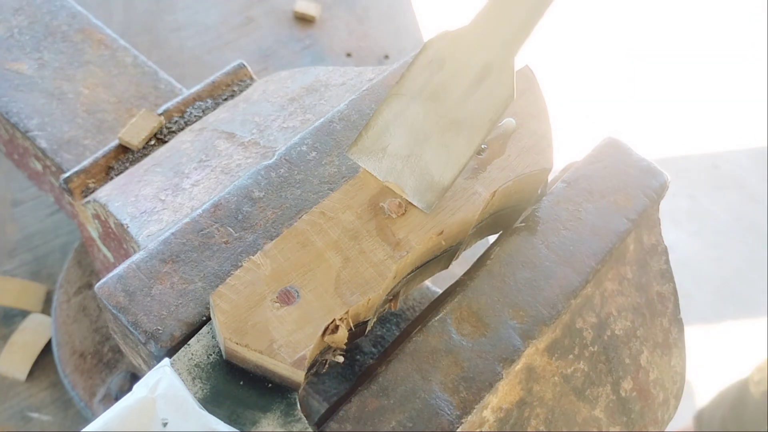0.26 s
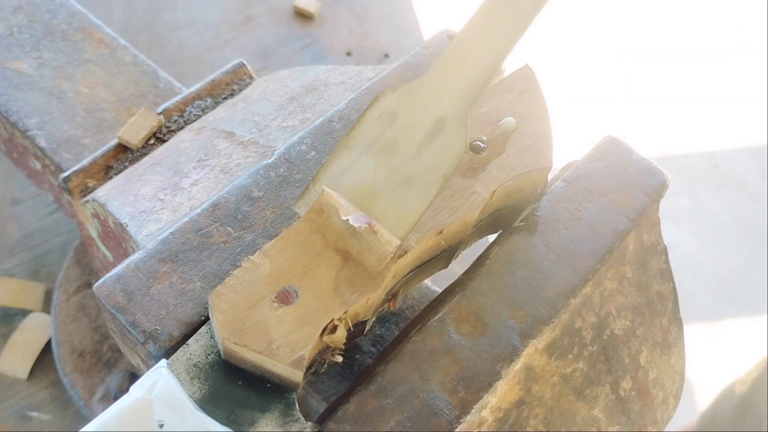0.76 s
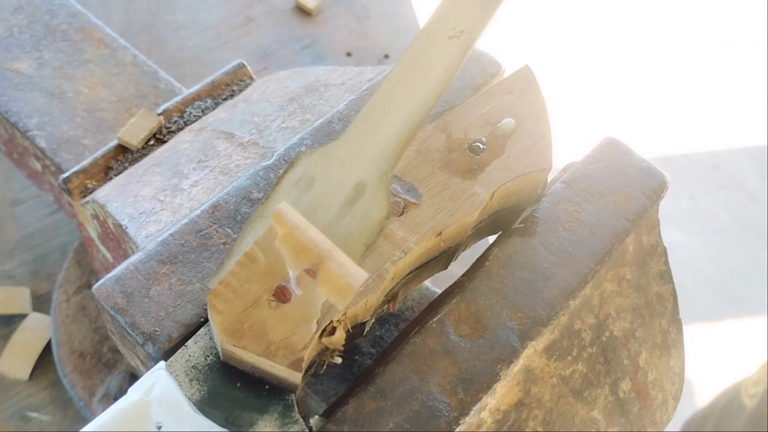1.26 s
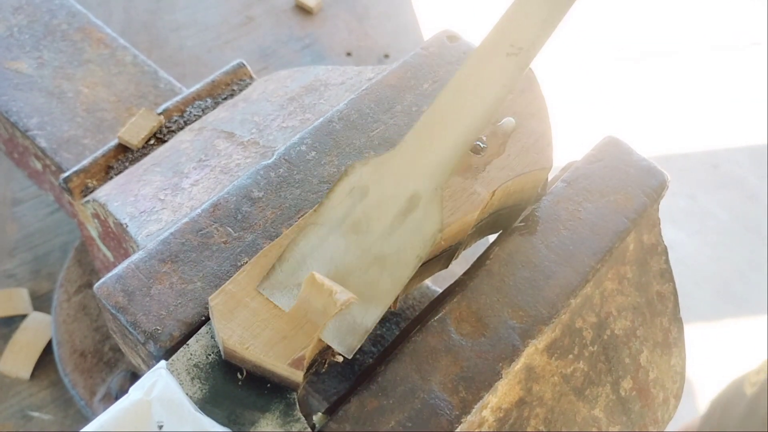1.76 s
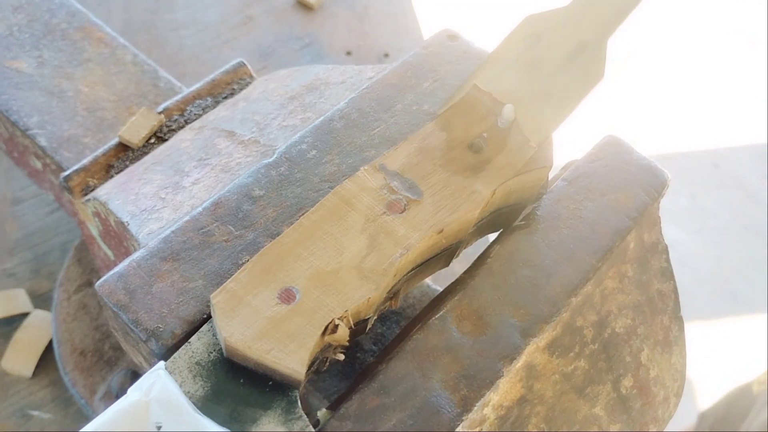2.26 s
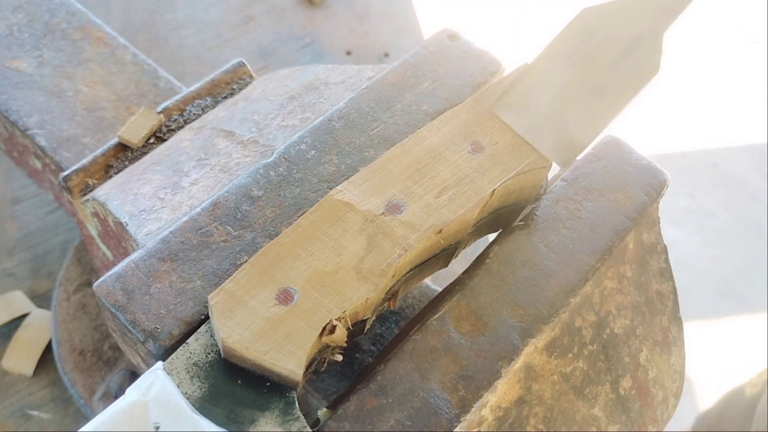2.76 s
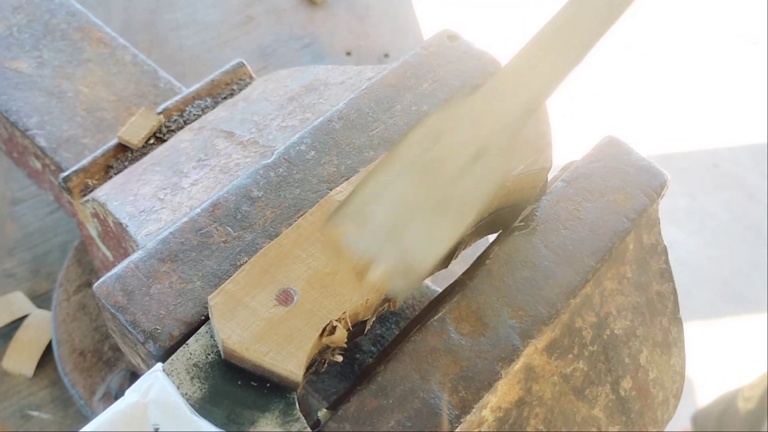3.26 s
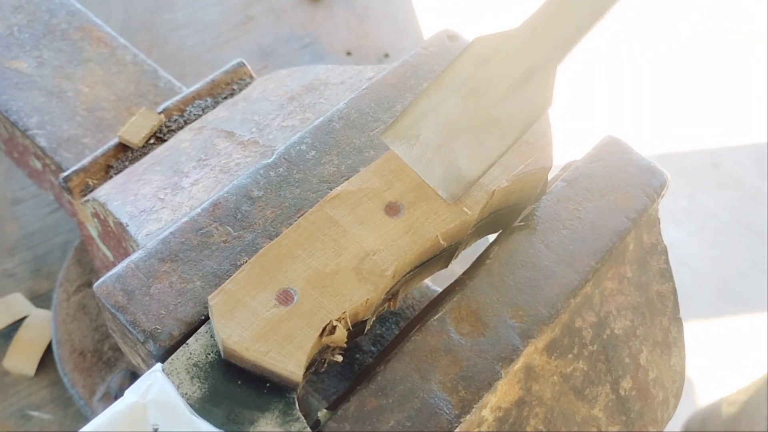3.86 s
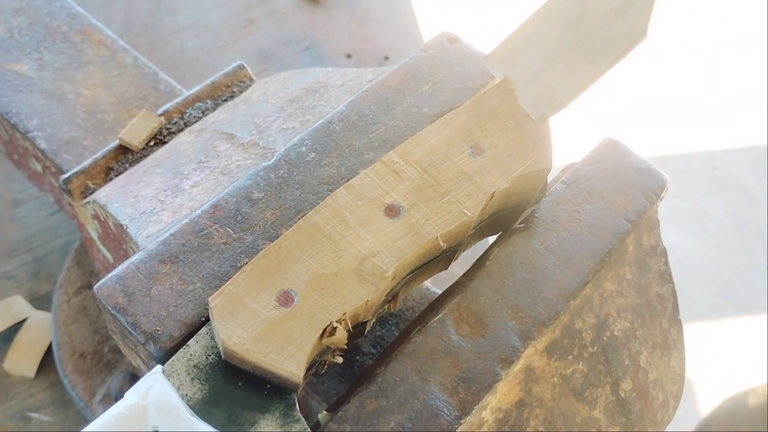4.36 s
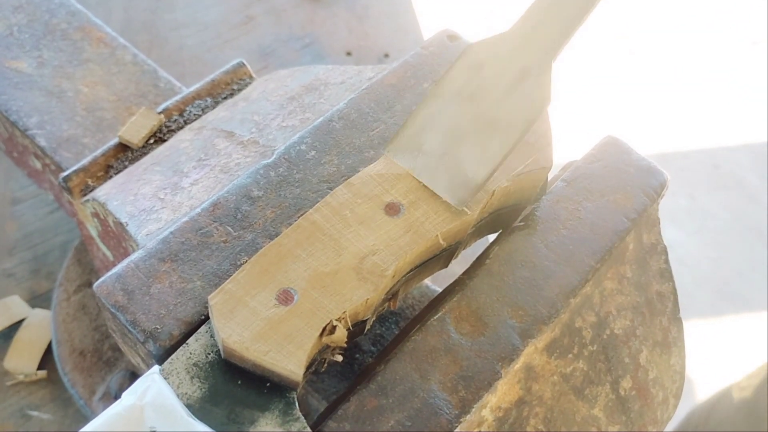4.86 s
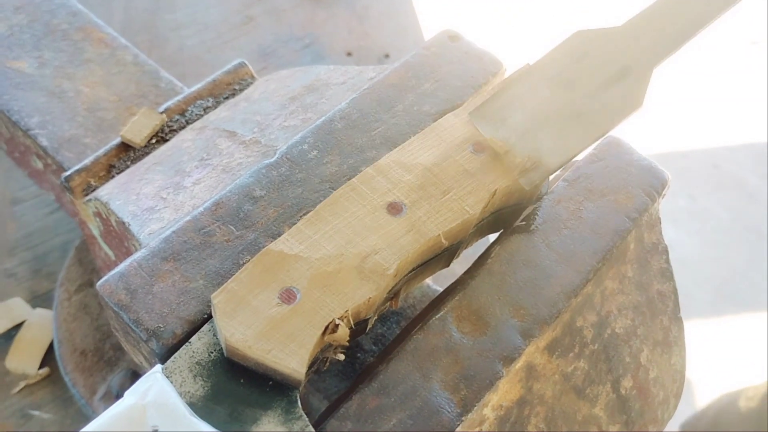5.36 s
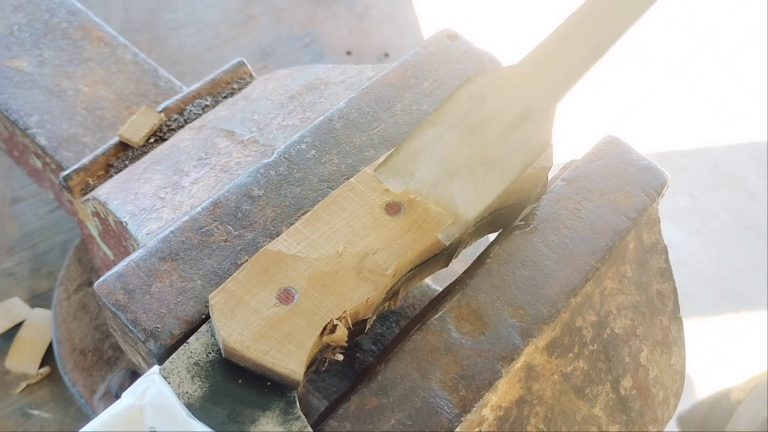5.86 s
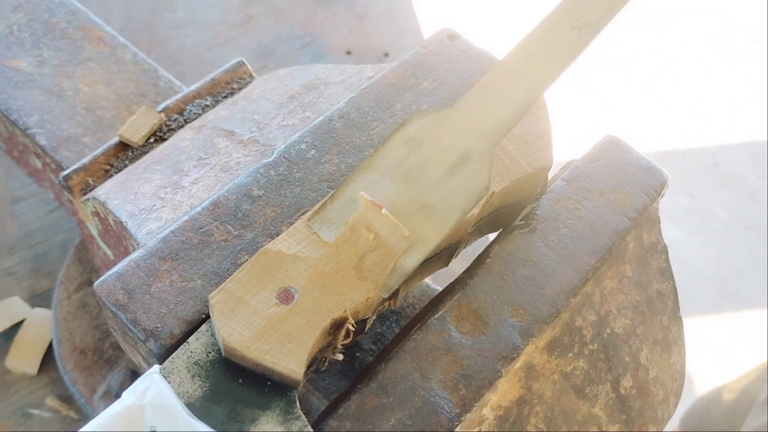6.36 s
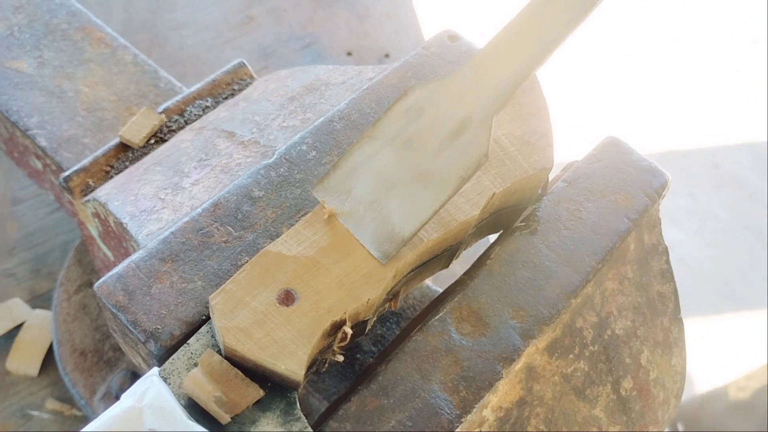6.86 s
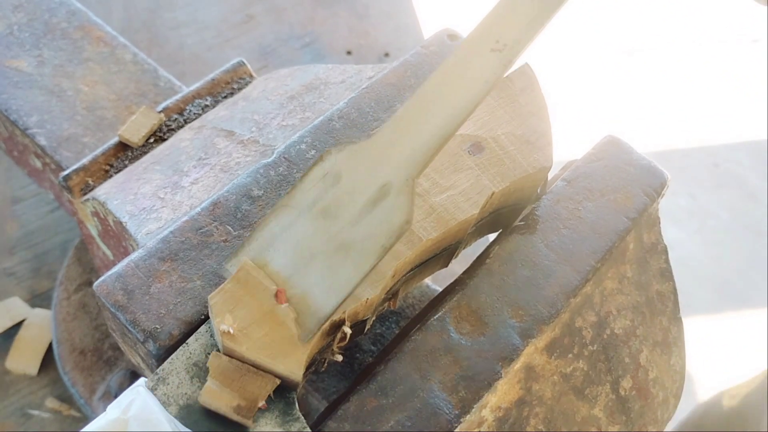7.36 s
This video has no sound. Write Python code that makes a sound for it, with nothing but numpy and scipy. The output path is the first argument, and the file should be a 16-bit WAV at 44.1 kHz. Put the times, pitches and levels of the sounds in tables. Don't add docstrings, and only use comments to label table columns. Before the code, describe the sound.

A chisel is knocked quickly along wood in a vise outdoors, with dry cracks, grainy rattles and scraping under heavy, thumping wind gusts.

```python
import sys
import numpy as np
from scipy import signal
from scipy.fft import rfft, irfft, next_fast_len
from scipy.io import wavfile
from scipy.ndimage import uniform_filter1d

SR = 44100
rng = np.random.default_rng(int(sys.argv[2]) if len(sys.argv) > 2 else 0)


def inscribe(sig):
    pcm = np.round(np.clip(np.atleast_2d(sig).T, -1, 1) * 32767)
    wavfile.write(sys.argv[1], SR, pcm.astype(np.int16))


def undo_db(level):
    steps = np.asarray(level, float) / 20
    return 10 ** steps


N = 335691


def in_time(rows):
    s, *columns = np.transpose(rows)
    return [np.interp(np.arange(N) / SR, s, column) for column in columns]


def rms_one(x):
    return x / np.sqrt(np.mean(x ** 2) + 1e-20)


def coloured(spectrum):
    size = next_fast_len(N)
    hz = np.maximum(np.arange(size // 2 + 1) * SR / size, 1)
    points = np.array(spectrum, float)
    gain = undo_db(np.interp(np.log(hz), np.log(points[:, 0]), points[:, 1]))
    return rms_one(irfft(rfft(rng.standard_normal(size)) * gain, size)[:N])


def drift(rate_hz):
    r = np.exp(-2 * np.pi * rate_hz / SR)
    return rms_one(signal.lfilter([1], [1, -2 * r, r * r], rng.standard_normal(N)))


def lowpass(x, order, top_hz):
    return signal.sosfilt(signal.butter(order, top_hz, fs=SR, output="sos"), x)


def resonate(push, modes, luck_db):
    out = 0
    for k, (hz, width, db) in enumerate(modes):
        r = np.exp(-np.pi * max(width, 20) / SR)
        b = np.array([1, 0, -1]) * (1 - r * r) / 2
        a = [1, -2 * r * np.cos(2 * np.pi * hz / SR), r * r]
        out = out + (-1) ** k * undo_db(db + luck_db[k]) * signal.lfilter(b, a, push)
    return out


# [t/s, level/dB]
BREEZE_CURVE = [(0, -43), (0.25, -19), (0.6, -43), (1.0, -28), (1.3, -39), (1.5, -39.5), (1.9, -41),
                (2.2, -39), (2.5, -33.5), (2.82, -40.5), (3.4, -34), (4.0, -36.5), (4.3, -8), (4.75, -37.5),
                (5.4, -26), (5.95, -34.5), (6.85, -32.5), (7.61, -33)]
# [centre t/s, depth/dB]
LULLS = [
    (0.9, 11),
    (4.235, 19),
    (6.42, 1.5),
    (7.17, 9),
    (7.535, 15),
]
LULL_S = 0.066


def breeze():
    t = np.arange(N) / SR
    db, = in_time(BREEZE_CURVE)
    return db - sum(depth_db * np.exp(-((t - s) / LULL_S) ** 2) for s, depth_db in LULLS)


# [centre t/s, level/dB]
NUDGES = [(0.007, -24.5), (0.46, -20), (0.539, -31), (0.812, -25.5), (0.987, -29), (1.012, -22),
          (1.184, -20), (1.258, -24.5), (1.306, -26.5), (1.331, -24.5), (1.362, -29), (1.383, -22.5),
          (1.749, -32), (1.926, -31), (2.031, -25), (2.261, -23.5), (2.41, -34), (2.639, -21),
          (2.661, -28.5), (2.686, -23.5), (3.089, -29.5), (3.149, -21), (3.256, -24.5), (3.309, -26),
          (3.565, -29), (3.6, -29), (3.665, -25.5), (3.726, -25.5), (3.789, -21.5), (3.845, -21),
          (3.944, -28.5), (4.028, -17.5), (4.67, -26), (4.69, -30), (4.744, -23), (4.853, -30),
          (4.999, -24), (5.252, -26), (5.621, -36), (5.821, -22), (6.002, -34), (6.162, -20.5),
          (6.222, -22), (6.253, -23), (6.49, -20), (6.727, -22.7), (7.049, -35), (7.081, -27), (7.305, -24),
          (7.446, -20)]
NUDGE_MS = 18.5
# [centre t/s, level/dB, width/ms, flutter/dB]
PUFFS = [(0.174, -4.5, 7.7, -4.5), (0.282, -4, 7.6, -17), (0.358, -12.5, 6.7, -17), (0.376, -20.5, 28, -7),
         (0.595, -20.5, 15, -2), (0.961, -21, 24, -2), (1.07, -3.5, 10, -5.5), (1.125, -12.5, 20, 0),
         (1.652, -20, 17, -5), (1.672, -12, 14, -7), (1.703, -10.5, 27, -1.5), (1.837, -15.5, 46, 1),
         (1.884, -11.5, 9.4, -11), (1.898, -7.5, 10.6, -23), (1.956, -23.5, 28, -9), (2.395, -20, 14, -4),
         (2.959, -7.5, 10.6, 3), (3.22, -7.5, 14.3, -14), (3.406, -9, 7.7, -5), (3.434, -11, 16, 4),
         (3.473, -21.5, 18, 14), (3.494, -12, 17, -4), (3.516, -7, 14.3, -5.5), (3.546, -20.5, 16, 4),
         (4.052, -6.5, 14.3, 3), (4.288, -11, 45, -0.5), (4.379, -11.5, 31, 1), (4.57, -12.5, 23.6, 4),
         (4.797, -11.5, 12.7, -7), (4.967, -9, 13, -16), (5.027, -13, 28, -1), (5.07, -14.5, 30, 10.5),
         (5.122, -12, 17, 0), (5.277, -20.5, 35, 4), (5.31, -8.5, 30, 3), (5.42, -13, 17.5, 10.5),
         (5.465, -11, 17.6, 9.5), (5.655, -16.5, 25, -9), (5.836, -18.5, 11, -8), (6.049, -10, 17.4, 1.5),
         (6.098, -12.5, 17, 12.5), (6.191, -21, 12, 0.0), (6.278, -20, 11.5, 10), (6.603, -15, 22, 1),
         (6.75, -8.5, 15, -5), (6.783, -5.5, 9.7, -5), (6.888, -11.5, 18, 2), (6.932, -15.5, 15.5, -3),
         (6.971, -23, 32, -2), (7.386, -16, 35, 4), (7.488, -21, 25, -6),
         (0.054, -15, 38, -24), (0.1, -15.5, 29, -20), (0.212, -9.5, 30, -5.5), (0.252, -10.5, 34, -1),
          (0.323, -11, 40, -2.5), (0.778, -19.5, 27, -18), (1.047, -10, 22.5, 3.5), (1.09, -14.5, 19, -1),
          (1.153, -20, 61, 0.0), (1.22, -13.5, 31, -9), (1.457, -18.5, 25, -20), (1.625, -4.5, 36.4, -10),
          (2.921, -14.5, 31, 1), (2.984, -15.5, 43, 1), (3.058, -22, 28, -1), (3.192, -15.5, 14, -7),
          (3.365, -16, 27, 1), (3.88, -9.5, 19.5, 4), (4.082, -7.5, 33.5, -7.5), (4.14, -9.5, 26, -1.5),
          (4.169, -18, 23, -14), (4.198, -19, 35, -1), (4.264, -15.5, 14, 4), (4.335, -10.5, 39, 5.5),
          (4.359, -16, 18, 11), (4.412, -18, 39, -11), (4.465, -5.5, 10.5, 1), (4.502, -15, 20, 8.5),
          (4.82, -14.5, 14, -24), (4.897, -17.5, 8.9, -8), (5.162, -13, 16, 1), (5.212, -15.5, 33.5, 6),
          (5.329, -14.5, 12, -3), (5.366, -12.5, 52, 3.5), (5.541, -12, 24, 9), (5.588, -21.5, 41, 2),
          (5.769, -18, 33, 2), (5.877, -18, 33, 4), (5.914, -20.0, 21, 4), (6.12, -5.5, 21, 2.5),
          (6.378, -20, 15, 1), (6.513, -8, 12, -3.5), (6.652, -6.5, 14, 1), (6.702, -13.5, 14, -5),
          (6.81, -7, 26.4, -2.5), (6.836, -9, 18, -22), (6.856, -17.5, 20, 7), (7.234, -18.5, 24, -5),
          (7.348, -18.5, 33, 3), (7.6, -13.5, 38, -6)]
# [f/Hz, level/dB per Hz]
WIND_COLOUR = [(15, -52.5), (25, -23), (114, 3.5), (157, 4), (448, -10), (700, -19), (910, -19),
               (1540, -120)]
RUMBLE_TOP_HZ = 437


def wind(steady_db):
    t = np.arange(N) / SR
    strength = undo_db(steady_db - 6.0 + 11.8 * np.minimum(drift(23), 1))
    flutter_db = np.zeros(N)
    nudges = [(s, db, NUDGE_MS, -3.0) for s, db in NUDGES]
    for s, db, width, own_db in PUFFS + nudges:
        near = slice(max(round((s - 0.1) * SR), 0), round((s + 0.1) * SR))
        offset = 2000 * (t[near] - s) / width
        offset = np.where(offset < 0, -1.4 * offset, 0.97 * offset)
        puff = undo_db(db - 6.42 * np.minimum(offset, 5) ** 1.53)
        flutter_db[near] = np.where(puff > strength[near], own_db, flutter_db[near])
        strength[near] = np.maximum(strength[near], puff)

    rumble = coloured(WIND_COLOUR)
    lumps = np.sqrt(uniform_filter1d(uniform_filter1d(rumble ** 2, 500), 500))
    rumble = rumble / (lumps + 0.013)
    rumble = rms_one(rumble * np.abs(rumble) ** 0.14)
    rumble = lowpass(rumble, 3, RUMBLE_TOP_HZ)

    flutter = coloured([(250, -1.5), (500, 9.0), (1000, -3.0), (2000, -19.5), (3500, -51.0), (7000, -86.0)])
    flutter = flutter * undo_db(uniform_filter1d(flutter_db, size=200) + 2.0 * drift(63))
    flutter = flutter * np.sqrt(1 + rumble ** 2)
    flutter_strength = undo_db(4.0) * strength * uniform_filter1d(strength, 2500) ** 1.172
    return strength * rumble + flutter_strength * flutter


# [t/s, level/dB, bite/dB]
PRESSURE = [(0, -54, 10.5), (0.4, -51, -14), (0.75, -43, -7), (1.35, -48.5, 2.5), (1.9, -51, -11),
            (2.3, -36, 0), (2.7, -50, 3), (3.25, -53.5, -2.5), (3.45, -48, 6), (3.62, -50.5, -11.5),
            (3.85, -39, -4), (4.1, -49.5, 0), (4.85, -47.5, -4.5), (5.55, -41.5, 9), (5.85, -48, 2.5),
            (6.15, -40.5, 0), (6.9, -44.5, -0.5), (7.61, -50.5, -2)]


def blade_pressure():
    return in_time(PRESSURE)


# [f/Hz, level/dB per Hz]
AIR = [(300, 12), (800, 16), (1500, 9), (2600, -5), (4500, -41), (8000, -19), (10500, -54), (16000, -54)]
# [f/Hz, level/dB per Hz]
HISS = [(1000, -3), (4500, -3), (6300, -19.5), (8000, -9), (9500, -16), (10800, -23), (16000, -23)]
HISS_DB, HISS_RISE_DB_PER_S = -63.5, 0.8
SPLINTER_TOP_HZ = 8500


def scrape(level_db, bite_db):
    fibres = rng.standard_normal(N) * undo_db(2.5 * drift(300))
    grit = resonate(fibres, [(1440, 1900, -4.5), (1533, 150, 10.0), (2200, 490, 5.0),
                             (2670, 170, 10), (3180, 750, -5.5), (4500, 870, -14)], np.zeros(6))
    grit = lowpass(grit, 4, SPLINTER_TOP_HZ)
    wander = undo_db(2.0 * drift(25))
    moving = undo_db(level_db) * wander * (coloured(AIR) + undo_db(bite_db - 7) * rms_one(grit))
    hiss = undo_db(HISS_DB + HISS_RISE_DB_PER_S * np.arange(N) / SR) * coloured(HISS)
    return moving + hiss


# [f/Hz, width/Hz, level/dB]
WOOD = [(450, 393, -4), (710, 130, 3), (819, 150, 4.5), (1145, 226, 4), (1305, 102, 9.5), (1542, 195, 4.5)]
# [f/Hz, width/Hz, level/dB]
BODY = [(2047, 310, -0.5), (2360, 74, 6.5), (2678, 300, 2), (3184, 294, 2.5), (3668, 170, 5),
        (4200, 420, -0.5), (4900, 520, -4.5), (5360, 270, -5)]
# [f/Hz, width/Hz, level/dB]
STEEL = [(6430, 630, -2), (7150, 96, 2.5), (7950, 2420, 5), (9450, 2900, -2.5), (12300, 180, -6),
         (13900, 710, -2.5), (15000, 1900, -8)]
SPLINTERS_PER_S, SPLINTER_DB = 2600, -16
SLICE_S, SLICE_JUMP_DB = 0.028, -1


def splinters(level_db):
    sizes = undo_db(1.6 * np.minimum(rng.exponential(1, N), 5)) * rng.choice([-1, 1], N)
    snaps = sizes * (rng.random(N) < SPLINTERS_PER_S / SR) + 1e-18
    slice_index = (np.arange(N) / SR / SLICE_S).astype(int)
    jumps = uniform_filter1d(rng.standard_normal(400)[slice_index], size=300)
    snaps = lowpass(snaps, 4, SPLINTER_TOP_HZ)
    ringing = resonate(snaps, WOOD[1:] + BODY + STEEL[2:4], [0] * 13 + [-15.0] * 2)
    return undo_db(level_db + SPLINTER_DB + SLICE_JUMP_DB * jumps) * rms_one(ringing)


def struck(noise, luck_db, shape, gate, wood_db, steel_db, tilt):
    part = 0
    groups = ((WOOD, wood_db, 1 - tilt, 0), (BODY, 0, 1, 8), (STEEL, steel_db, 1 + tilt, 16))
    for modes, level_db, speed, skip in groups:
        ringing = resonate(noise * shape ** speed, modes, luck_db[skip:])
        ringing = ringing * gate * shape ** 0.038
        part = part + undo_db(level_db) * ringing / np.sqrt(np.sum(ringing ** 2) / np.sum(gate ** 2))
    return part


# [centre t/s, level/dB, steel/dB]
BRUSHES = [(0.249, -45.5, -15.5), (0.418, -36.5, -20), (0.497, -40, -17), (0.527, -49, -20),
           (0.567, -49, -23.6), (0.634, -42, -17), (0.796, -42.5, -16), (0.87, -39, -11),
           (0.897, -42.3, -13), (0.942, -38, -14.2), (0.984, -41.5, -17.2), (1.019, -44, -16.7),
           (1.073, -47, -19.6), (1.11, -45, -10), (1.21, -41.5, -13), (1.243, -40, -12),
           (1.304, -42, -21.4), (1.532, -43, -15), (1.668, -42, -19), (1.776, -38.5, -22),
           (1.799, -35.5, -20), (2.066, -40, -16.8), (2.223, -38.5, -10), (2.246, -44, -25),
           (2.289, -38.5, -23.4), (2.415, -41, -18.1), (2.539, -34.5, -20), (2.758, -42, -23),
           (2.85, -43.5, -27), (2.942, -36, -17.0), (3.424, -44, -18.1), (3.487, -36.5, -23),
           (3.565, -45.5, -9), (3.706, -38, -29), (3.864, -42.5, -4), (4.261, -47, -15), (4.29, -49, -19),
           (4.345, -55, -35), (4.375, -58, -33.9), (4.446, -42.8, -25), (4.517, -40, -19.4),
           (5.108, -35.6, -19.9), (5.238, -57, -18), (5.397, -38, -24), (5.426, -35.7, -25),
           (5.636, -45, -20.7), (5.673, -40, -19), (5.688, -47, -23.2), (5.906, -44, -15.8),
           (5.98, -46.5, -13), (6.075, -44, -10), (6.279, -39, -15), (6.409, -40.5, -16.9),
           (6.471, -39, -24), (6.542, -36, -18.0), (6.656, -43, -15), (6.8, -51, -32), (6.864, -51, -19.2),
           (7.422, -35.5, -22), (7.492, -44, -19)]
BRUSH_MS = 16
# [centre t/s, level/dB, width/ms, steel/dB, wood/dB]
RATTLES = [(0.461, -36, 24, -15, 5.5), (0.688, -38, 32, -16, 3), (0.831, -32.5, 9.6, -10, 7),
           (1.174, -40, 23, -10, 12), (1.61, -29.5, 18, -17, 6.5), (1.691, -31.5, 16, -14, 6),
           (1.825, -34, 23.5, -17, 8), (2.032, -29.5, 20, -15, 2), (2.127, -40, 38, -12, 9),
           (2.378, -27.5, 21, -17, 4), (2.615, -37, 20, -16, 6), (2.882, -37, 18, -19, 6),
           (3.026, -25.5, 24, -17.5, 0), (3.674, -33.5, 17, -16, 6), (3.902, -40, 7.4, -20, 17),
           (3.985, -31, 22, -13, 0.5), (4.122, -45, 10, -18, -1), (4.633, -47, 18, -20, 10),
           (4.656, -38.5, 26, -20, 11), (4.767, -40.5, 32, -16, 11.5), (4.907, -36.5, 17, -21, 6.5),
           (4.937, -50, 12, -13, 12), (5.026, -35, 23, -19, 5), (5.568, -37, 20, -23, 7),
           (5.818, -32, 31, -19, 2.5), (6.093, -46, 8.5, -24, 17.5), (6.172, -35, 53, -20, 6.5),
           (6.258, -32.5, 45, -19, 2.5), (6.325, -41, 16, -20, -9), (6.511, -37.5, 30, -23, 5),
           (6.749, -37.5, 17, -18, 14), (6.999, -33, 16, -22, 7), (7.051, -47, 11, -27, 16),
           (7.28, -34, 17, -16, 6.5), (7.331, -36, 24, -20, 4), (7.398, -46, 15, -21, 5),
           (7.543, -57, 9.1, 2, -1), (7.578, -34.5, 13.4, -21, 5)]


def slices():
    out = np.zeros(N + 8192)
    ms = np.arange(4096) / SR * 1000 - 50
    rows = RATTLES + [(s, db, BRUSH_MS, steel_db, 3.5) for s, db, steel_db in BRUSHES]
    luck = rng.standard_normal((len(rows), 26)) * 3.8
    grain_levels = undo_db(3.2 * rng.standard_normal((len(rows), 128))).repeat(32, axis=1)
    grains = rng.standard_normal((len(rows), 4096)) * grain_levels
    for (s, db, width, steel_db, wood_db), chance, noise in zip(rows, luck, grains):
        distance = np.maximum(ms, -1.3 * ms) / (1.235 * min(width, 45))
        gate = np.cos(np.pi / 2 * np.clip(distance, 0, 1)) ** 3.1
        noise = signal.lfilter([1], [1, -0.55], noise)
        at = round((s - 0.05) * SR)
        ring = struck(noise, chance, undo_db(-0.2 * ms), gate, wood_db, steel_db, tilt=0.25)
        out[at:at + 4096] += undo_db(db - 2.0) * ring
    return out[:N]


# [t/s, level/dB, length/ms, wood/dB]
FADING_BLOWS = [(0.5865, -23.5, 20, 5.5), (1.0376, -14.5, 10.5, -2), (1.1371, -17, 6.3, -5.5),
                (1.27, -14.5, 4.3, 3.5), (1.3278, -40.5, 33, 12), (1.3735, -18.5, 11.7, 1),
                (1.3813, -32.5, 1.3, 14), (2.4521, -16.5, 0.99, 0.5), (2.9008, -24.5, 6.7, -2.5),
                (3.7206, -28, 21, 7), (4.0847, -27.5, 7.3, 1), (4.134, -28.5, 24, 1.5),
                (4.5384, -18.5, 3.9, 5.5), (4.679, -16.5, 12, 3.5), (5.0456, -17, 17.3, -2),
                (5.316, -28, 16.4, 6.5), (5.4439, -13.5, 7.9, -4), (5.5383, -15, 4, -0.5),
                (5.589, -27.5, 14, 2.5), (6.2002, -20.5, 6.7, 1.5), (6.3424, -25, 20.3, 6),
                (6.622, -25, 20, 2), (6.926, -25, 19.6, 0), (7.025, -14.5, 1.6, -2),
                (7.0671, -26, 19.4, -1), (7.2978, -16, 8.7, 0), (7.4411, -25, 16.7, 6.5)]
# [t/s, level/dB, length/ms, wood/dB, steel/dB]
HELD_BLOWS = [(0.6629, -14.5, 0.34, -1, -12.5), (1.702, -26.5, 17.7, 4.5, -11.5),
              (1.7537, -15, 0.58, -1.5, -15), (2.4643, -33.5, 17.4, 5.5, -14),
              (2.5539, -19, 5.2, -3, -12.5), (2.634, -25.5, 10.5, 2, -17), (2.6499, -18, 15, -2, -9.5),
              (3.6431, -12.5, 2.6, -1.5, -10), (3.804, -32.5, 14, 3, -13), (4.414, -27, 4.3, -0.5, -13.5),
              (5.1292, -27.5, 5.6, -4, -24), (5.831, -15.5, 9.7, -3.5, -16), (6.5704, -23.5, 6.7, 0.5, -11),
              (6.7105, -20.5, 15.2, -2.5, -14.5)]
# [t/s, level/dB, length/ms, wood/dB, steel/dB]
DYING_BLOWS = [(1.414, -19.5, 9.8, 0, -11), (1.8469, -29, 21.4, 9, -11.5), (1.994, -23.5, 10, 6, -10.5),
               (2.0976, -18, 1.2, 1.5, -10), (2.1835, -33.5, 20, 7.5, -16), (2.2575, -26.5, 5, 0.5, -8.5),
               (2.9726, -21, 7.8, -3, -13), (3.3923, -38.5, 13, 7, -20), (3.4558, -15.5, 5.6, -1, -9.5),
               (4.3255, -36, 4.8, 14.5, -30), (4.4778, -18.5, 10.4, 1, -11), (4.5836, -32, 26, 12, -12),
               (4.956, -25, 24, 4, -17.5), (5.4924, -31, 30, 3, -23), (6.1155, -28.5, 13, 4.5, -15.5),
               (6.2987, -24, 3.5, -3.5, -13.5), (6.7642, -22.5, 15, 7.5, -17),
               (7.156, -23.5, 1.1, -1, -11.5), (7.3609, -21.5, 9.5, 5.5, -10)]
HELD_LOSS_DB, FADING_LOSS_DB, DYING_LOSS_DB = 6.5, 11, 17.5
STEEL_DB, STEEL_PER_DOUBLING_DB = -13.5, -2
STEEL_LOSS_DB_PER_S = 0.6


def blow_rows():
    fading = []
    for s, db, length, wood_db in FADING_BLOWS:
        steel_db = STEEL_DB + STEEL_PER_DOUBLING_DB * np.log2(length / 10) - STEEL_LOSS_DB_PER_S * (s - 4)
        fading.append((s, db, length, wood_db, steel_db))
    kinds = ((HELD_BLOWS, HELD_LOSS_DB), (fading, FADING_LOSS_DB), (DYING_BLOWS, DYING_LOSS_DB))
    return [(s, db, length, loss_db, wood_db, steel_db)
            for table, loss_db in kinds for s, db, length, wood_db, steel_db in table]


SLICE_FADE_MS = 7.2


def blows():
    out = np.zeros(N + 4096)
    ms = np.arange(2048) / SR * 1000
    rows = blow_rows()
    luck = rng.standard_normal((len(rows), 24)) * 2.67
    rattle = rng.standard_normal((len(rows), 2048))
    contact = np.clip(ms / 0.17, 0.02, 1) * (1 + 3.7 * np.exp(-ms / 0.15))
    clack = 2.27 * np.sin(np.pi * np.clip((ms - 0.25) / 0.059, 0, 1))
    for (s, db, length, loss_db, wood_db, steel_db), chance, noise in zip(rows, luck, rattle):
        shape = contact * undo_db(-1.2 * max(loss_db, 0) * ms / length)
        fade_ms = min(SLICE_FADE_MS, length * 0.19 + 0.79)
        gate = np.sin(np.pi / 2 * np.clip((length + 3.77 - ms) / fade_ms, 0, 1)) ** 2
        at = round(s * SR)
        ring = struck(noise + clack, chance, shape, gate, wood_db, steel_db, tilt=0.052)
        out[at:at + 2048] += undo_db(db) * ring
    return signal.sosfilt(signal.butter(3, 580, "high", fs=SR, output="sos"), out[:N])


def scene():
    scrape_db, bite_db = blade_pressure()
    weather = wind(breeze())
    blade = scrape(scrape_db, bite_db) + splinters(scrape_db)
    return (weather + blade + slices() + blows())[None]


def band_limit(x):
    return signal.sosfilt(signal.butter(12, 16950, fs=SR, output="sos"), x)


MIC_TOP_HZ = 16800


def record(dry):
    dipped = dry - 0.49 * resonate(dry, [(6400, 560, 0.0018)], [0])
    limited = dipped / np.sqrt(np.sqrt(1 + dipped ** 4))
    cut = signal.sosfilt(signal.cheby2(10, 50, MIC_TOP_HZ, fs=SR, output="sos"), limited)
    return band_limit(cut)


dry = scene()
out = record(dry)
inscribe(out)
```